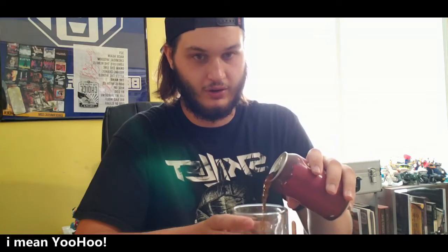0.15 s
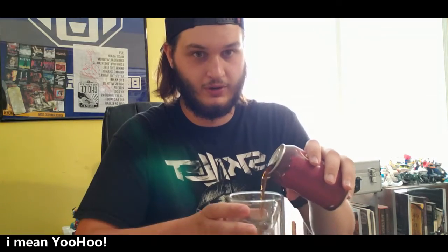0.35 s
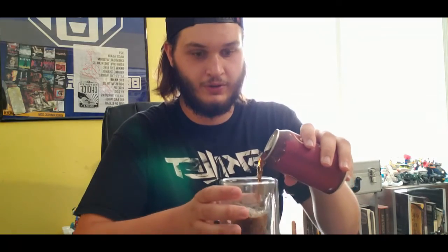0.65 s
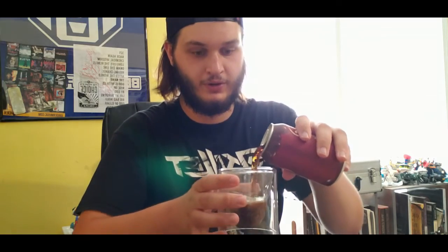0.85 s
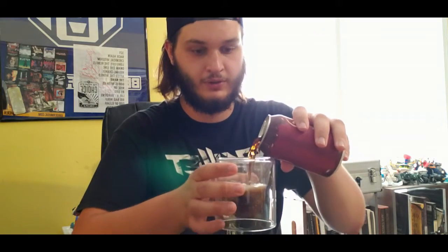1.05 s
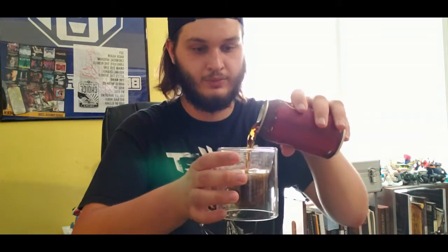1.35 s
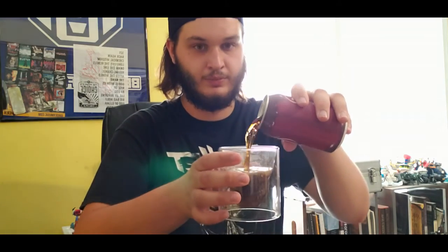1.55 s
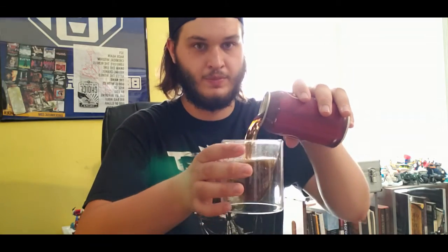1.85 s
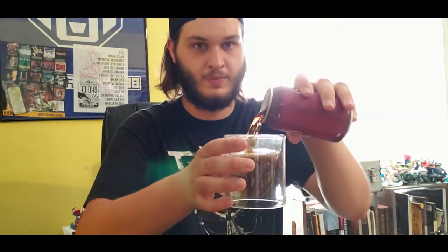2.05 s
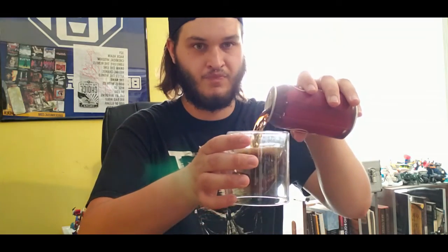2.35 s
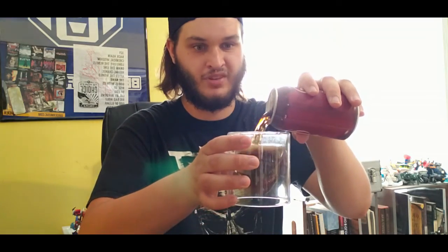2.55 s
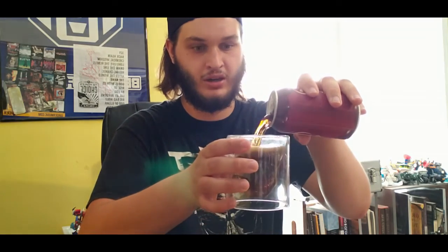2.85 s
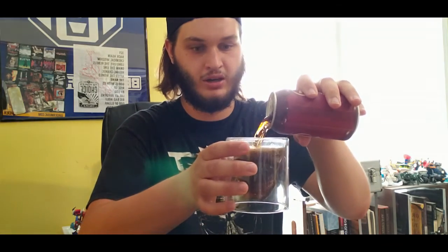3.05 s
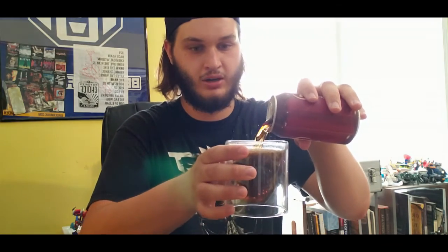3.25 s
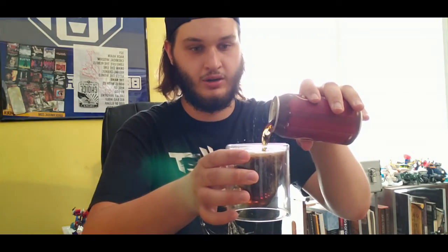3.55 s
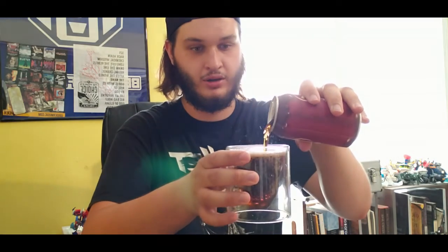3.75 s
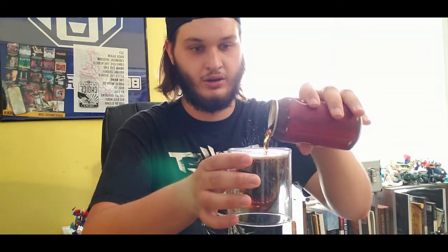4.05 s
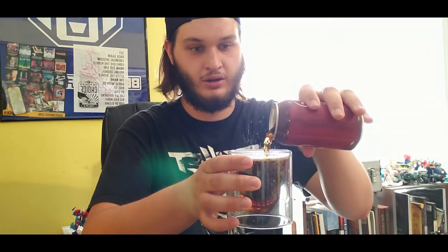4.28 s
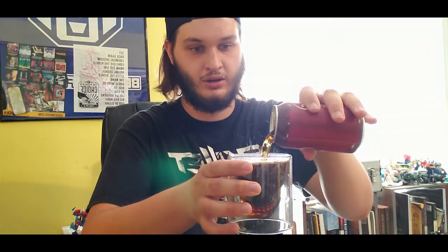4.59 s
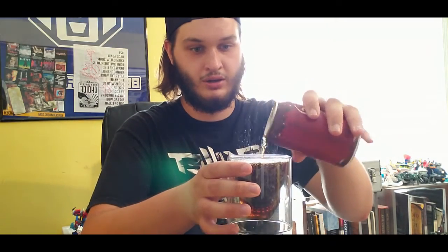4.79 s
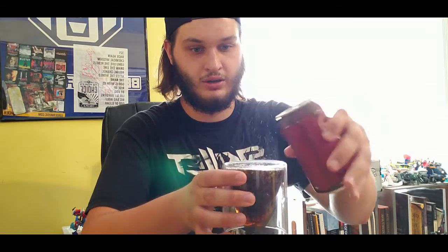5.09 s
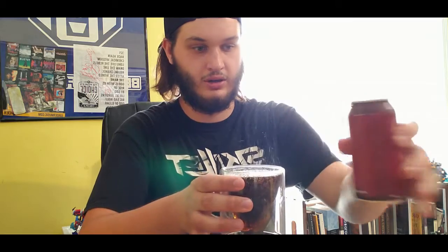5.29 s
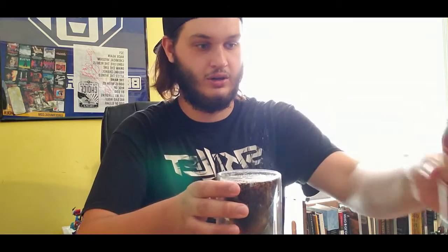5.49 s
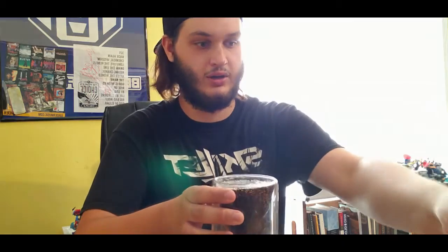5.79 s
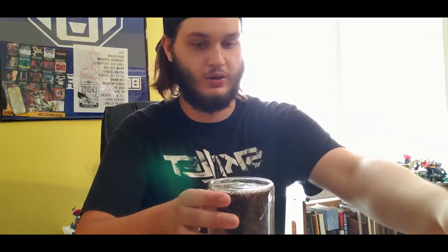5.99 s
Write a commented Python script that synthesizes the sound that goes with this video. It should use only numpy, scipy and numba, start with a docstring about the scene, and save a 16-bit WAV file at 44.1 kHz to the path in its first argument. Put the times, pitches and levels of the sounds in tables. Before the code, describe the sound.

Soda splashes brightly into an empty glass up close, quickly cushions into soft fine fizz, then a can knocks once on a wooden shelf.

```python
"""Soda is poured from a can into a glass close to a pair of microphone ports in a quiet room.
The stream first splashes on the bare bottom: ringing bubbles, noisy spatter and fine spray.
Foam then cushions it, with random clicks as fizz that gets finer in the later part of the pour.
Dull far-off thuds, a fluttering ring and brief low notes come in between, from struck filters and sines.
At the end the can is set down on a wooden shelf and rocks once: soft pulses set shelf and can ringing."""
import sys
import numpy as np
from scipy import signal
from scipy.fft import rfft, irfft, next_fast_len
from scipy.io import wavfile
from numba import njit

SR = 44100
rng = np.random.default_rng(int(sys.argv[2]) if len(sys.argv) > 2 else 0)


def bounce(signal):
    """Save signal as a 16-bit WAV file at the path given by the first command-line argument."""
    frames = np.transpose(np.atleast_2d(signal))
    limited = np.clip(frames, -1, 1)
    pcm = np.round(limited * 32767).astype(np.int16)
    wavfile.write(sys.argv[1], SR, pcm)


N = 270156
TIME = np.arange(N) / SR   # the moment of each sample, in seconds


def amp(db):
    """Decibels to gain."""
    return 10 ** (np.asarray(db) / 20)


def rms_one(x):
    """Scale to unit rms, the usual measure of average strength."""
    return x / np.sqrt(np.mean(x ** 2) + 1e-20)


def filtered(x, order, cut_hz, kind="low"):
    """Smooth filter that keeps the lows, the highs or a band."""
    sos = signal.butter(order, cut_hz, kind, fs=SR, output="sos")
    return signal.sosfilt(sos, x + 1e-18)   # the tiny offset keeps silence from slowing the sums


def in_time(rows):
    """Columns of a curve table, sample by sample."""
    s, *columns = np.transpose(rows)
    return [np.interp(TIME, s, column) for column in columns]


def on_bins(rows, column, size):
    """A table column read at the frequencies of a transform, on a logarithmic pitch scale."""
    hz = np.maximum(np.arange(size // 2 + 1) * SR / size, 1)
    table = np.array(rows)
    return np.interp(np.log(hz), np.log(table[:, 0]), table[:, column])


def coloured(x, rows, column):
    """Minimum-phase filter with the dB response of a table column, so nothing sounds early."""
    size = 8192
    cepstrum = irfft(np.log(amp(on_bins(rows, column, size))))
    # folding the second half onto the first puts the whole response after the start
    cepstrum[1:size // 2] *= 2
    cepstrum[size // 2 + 1:] = 0
    response = irfft(np.exp(rfft(cepstrum)))
    return signal.oaconvolve(x, response)[:N]


def drift(rate):
    """Slow random wandering, spread 1; a higher rate wanders faster."""
    r = np.exp(-80 * np.pi * rate / SR)   # one slow value for every 40 samples
    noise = rng.standard_normal(N // 40 + 2002)
    slow = signal.lfilter([1], [1, -2 * r, r * r], noise)[2000:]
    return np.interp(np.arange(N) / 40, np.arange(len(slow)), rms_one(slow))


def grains(per_s, spread_db):
    """Random clicks of uneven size and sign."""
    sizes = amp(spread_db * np.minimum(rng.exponential(1, N), 5))
    signs = rng.choice([-1, 1], N)
    return sizes * signs * (rng.random(N) < per_s / SR)


def ring(clicks, hz, t60):
    """A unit click sets a sine of height 1 ringing; it falls by 60 dB in t60 seconds."""
    r, w = amp(-60 / (t60 * SR)), 2 * np.pi * hz / SR
    return signal.lfilter([0, np.sin(w)], [1, -2 * r * np.cos(w), r * r], clicks + 1e-18)


@njit
def swept(x, hz, damping, rate):
    """State-variable filter with a moving centre: high-pass and band-pass outputs."""
    high, band, a, b = np.zeros(len(x)), np.zeros(len(x)), 0., 0.
    for i in range(len(x)):
        g = np.tan(np.pi * hz[i] / rate)
        high[i] = (x[i] - (damping + g) * a - b) / (1 + g * (damping + g))
        band[i] = g * high[i] + a
        low = g * band[i] + b
        a, b = 2 * band[i] - a, 2 * low - b
    return high, band


def thinning(count, thin_s):
    """Random times that get rarer, with three chance values each."""
    chance = rng.random((count, 4))
    times = SPRAY_FROM_S - thin_s * np.log(1 - chance[:, 0])
    return np.minimum(times, 5), *chance[:, 1:].T


def patchy(x, depth_db):
    """Each band swells and sinks a little on its own."""
    out, edges = x.copy(), np.geomspace(1500, 15500, 7)
    for low_hz, high_hz in zip(edges, edges[1:]):
        band = filtered(x, 1, [low_hz, high_hz], "band")
        out += (amp(depth_db * drift(21)) - 1) * band
    return out


def room(x, t60, cut_hz):
    """Many mingled echoes make a diffuse dying tail, its own in each channel."""
    t = np.arange(round(t60 * SR)) / SR
    tails = rng.standard_normal((2, len(t))) * amp(-60 * t / t60) * np.minimum(t / 0.008, 1)
    tails = filtered(tails, 1, cut_hz)
    return np.array([signal.oaconvolve(x, tail / np.linalg.norm(tail))[:N] for tail in tails])


# the two ports towards the glass:
# (frequency [Hz], left level [dB], right level [dB], left-right likeness [0 to 1])
PORT_COLOUR = [(477, -1, -7.5, 0.98), (1050, 0, -3.5, .5), (1530, -5, -17.5, 0.098),
               (1840, 0.5, -3.5, 0.13), (2230, -3.5, -16.5, 0.2), (3500, 0, -2.5, 0.45),
               (3870, -1.5, -9, 0.067), (4800, 1, -5, 0.15), (5140, -1, -17, .1), (6890, 5.5, -4, 0.86),
               (7730, 2, -4.5, 0.43), (8770, -4.5, -12.5, .4), (12200, 1.5, -4, 1),
               (15660, 0.5, -3.5, 0.74)]
# narrow lifts at the left port: (frequency [Hz], width [Hz], level against the direct sound [dB])
LEFT_LIFTS = [(1040, 90, -1), (1480, 360, 1), (1750, 107, 5), (2116, 62, 10.5), (4920, 210, -6.5)]


def left_port(x):
    """Narrow resonances join the sound, then the broad colour of the left port shapes it."""
    lifted = x.copy()
    for hz, width_hz, db in LEFT_LIFTS:
        r = np.exp(-np.pi * width_hz / SR)
        b = (1 - r * r) / 2 * np.array([1, 0, -1])
        a = [1, -2 * r * np.cos(2 * np.pi * hz / SR), r * r]
        lifted += amp(db) * signal.lfilter(b, a, x)
    return coloured(lifted, PORT_COLOUR, 1)


def ports(shared, apart):
    """Both ports hear the shared sound; the right one partly hears an unrelated part instead."""
    size = 2 * next_fast_len(N // 2)
    alike = np.clip(on_bins(PORT_COLOUR, 3, size), 0, 1)
    mixed = alike * rfft(shared, size) + np.sqrt(1 - alike ** 2) * rfft(apart, size)
    right = irfft(mixed)[:N]
    return np.array([left_port(shared), coloured(right, PORT_COLOUR, 2)])


# colour of the quiet room: (frequency [Hz], relative level [dB])
ROOM_COLOUR = [(12, -11), (20, -35), (54, -1), (149, -10.5), (191, -18.5), (344, -17), (590, -17),
               (757, -20), (1010, -23), (1390, -23), (4400, -16.5), (5720, -79), (9680, -120)]
ROOM_DB = -66   # mean of the two channels; the left is a little louder


def room_tone():
    """Low steady rumble and faint hiss from shaped noise, more alike in the bass."""
    common, left, right = rng.standard_normal((3, N))
    common = 1.41 * filtered(common, 1, 500)
    both = np.array([coloured(common + own, ROOM_COLOUR, 1) for own in (left, right)])
    return amp(ROOM_DB) * rms_one(both) * amp([[1], [-1]])


# the foam: (time [s], fizz level [dB], pitch of the largest bursting bubbles [Hz],
#            lift by the air in the glass [dB])
FOAM_CURVE = [(0, -42, 2050, -12), (.3, -46, 2250, 6), (.62, -49, 3360, 10.5), (1, -50, 2720, 10.5),
              (1.5, -49, 1860, 4), (2, -48.5, 1490, -0.5), (2.8, -47.5, 1680, -2.5), (3.6, -46, 1960, 2),
              (4.3, -46.5, 2100, 6.5), (4.8, -45, 2740, 3.5), (5.1, -45, 3220, 1), (5.45, -46.5, 4300, 2),
              (5.75, -48, 5700, -22), (6.13, -50.5, 6100, -13)]
STRAGGLER_DB = -14   # larger bubbles, with a softer cut below that pitch
AIR_HZ, AIR_SAG_HZ, AIR_SAG_S = 2816, 900, 1.2   # the air's note sinks to AIR_HZ from 900 Hz above
AIR_DAMPING = .13   # small damping makes a narrow resonance
# a high ring grows once the foam reaches the brim, and climbs to its pitch
BRIM_HZ, BRIM_CLIMB_HZ, BRIM_DB, BRIM_FROM_S, BRIM_RISE_S = 7500, 800, -0.5, 4.67, 0.88


def fizz():
    """Thousands of bubbles burst each second; as the foam settles only the small, high ones are left."""
    fizz_db, edge_hz, air_db = in_time(FOAM_CURVE)
    level = amp(fizz_db + 0.52 * drift(15))
    parts = []
    for _ in range(2):
        small = rms_one(grains(14000, spread_db=2.5))
        large = rms_one(grains(4300, spread_db=3.0))
        for damping in (1.6, 1.2, .8):   # three high-pass stages make a steep edge
            small = swept(small, edge_hz, damping, SR)[0]
        stragglers = amp(STRAGGLER_DB) * swept(large, edge_hz, 2.9, SR)[0]
        parts.append(level * (small + stragglers))
    heard = ports(*parts)
    air_hz = AIR_HZ + AIR_SAG_HZ * np.exp(-TIME / AIR_SAG_S)
    brim = np.clip((TIME - BRIM_FROM_S) / BRIM_RISE_S, 0, 1)
    brim_hz = BRIM_HZ - BRIM_CLIMB_HZ * (1 - brim)
    # the mouth of the glass faces the left port
    for hz, gain in ((air_hz, amp(air_db)), (brim_hz, amp(BRIM_DB) * brim)):
        heard[0] += gain * AIR_DAMPING * swept(heard[0], hz, AIR_DAMPING, SR)[1]
    return patchy(heard, depth_db=.9)


# bubbles dragged under by the stream: (time [s], level [dB])
STREAM_CURVE = [(0.0, -52), (0.2, -59), (0.56, -51), (0.92, -59.5), (2.24, -64), (3.65, -64.5), (3.87, -70),
                (4.6, -85)]


def gurgle():
    """Bubbles dragged under by the stream ring about ten cycles."""
    clicks = grains(1500 * amp(1.0 * drift(15)), spread_db=4.5)
    pitches = np.geomspace(960, 1550, 12)
    dealt = rng.integers(0, 12, N)   # each click is dealt to one pitch
    notes = sum(ring(clicks * (dealt == k), hz, 10.0 / hz) for k, hz in enumerate(pitches))
    return amp(in_time(STREAM_CURVE)[0]) * rms_one(notes)


# the loud spatters of flung drops: (time [s], peak level [dB], centre pitch [Hz])
LOUD_SPATTERS = [(0.0124, -27, 6480), (0.0197, -26, 6240), (0.031, -12.5, 7700), (0.0394, -22, 8100),
                 (0.0817, -34, 5900), (0.0879, -13, 8900), (0.0944, -20, 3870), (0.114, -18, 3900),
                 (0.121, -22, 3650), (0.1294, -23.5, 3900), (0.1516, -23.5, 7300), (0.2117, -23, 3670),
                 (0.2448, -22, 2850), (0.2588, -19.5, 4760), (0.2853, -18, 3770), (0.292, -25, 4000),
                 (0.417, -25, 7500), (0.449, -28, 7700), (0.5003, -17.5, 4800), (0.5096, -22, 7600),
                 (0.5447, -20.5, 7900), (0.6789, -25.5, 7800), (1.3798, -37.5, 3440), (2.5454, -29.5, 7800)]
# lesser drops at random: loudest level and its fading, thinning, and pitch before chance is added
DROP_DB, DROP_LOSS_DB_PER_S, DROP_THIN_S, DROP_HZ = -25.5, 17, .2, 3630


def spatter():
    """Each spatter is a burst of crackle with a ring at its own pitch."""
    out, t = np.zeros(N), np.arange(1500) / SR
    s, a, b, c = thinning(count=26, thin_s=DROP_THIN_S)
    drop_db = DROP_DB - DROP_LOSS_DB_PER_S * s - 11.0 * a
    octave = np.where(c < .5, 1, 2)   # about half of them ring an octave higher
    drop_hz = DROP_HZ * (0.845 + 0.3 * b) * octave
    drops = [*LOUD_SPATTERS, *zip(s, drop_db, drop_hz)]
    for (s, db, hz), n in zip(drops, rng.standard_normal((len(drops), 1500))):
        crackle = n * np.abs(n) * amp(-60 * t / 0.023)
        burst = np.diff(crackle, prepend=0) + amp(-7.5) * ring(crackle, hz, 20.0 / hz)
        i = round(s * SR)
        out[i:i + 1500] += amp(db) * burst / np.abs(burst).max()
    return out


SPRAY_DB, SPRAY_FROM_S, SPRAY_LOSS_DB_PER_S = -43, 0.013, 55   # level at the start, start, fading


def spray():
    """Dense bright crackle of fine droplets off the bare bottom, dying as the pool deepens."""
    t = TIME - SPRAY_FROM_S
    crackle = grains(2500 * amp(4.2 * drift(28)), spread_db=2.5)
    crackle = filtered(crackle, 2, [2200, 9000], "band")
    return amp(SPRAY_DB - SPRAY_LOSS_DB_PER_S * t) * (t > 0) * rms_one(crackle)


# the loud splashes: (time [s], level [dB], bubble pitch [Hz], cavity level against the bubble [dB])
LOUD_SPLASHES = [(0.016, -31, 1080, -13), (0.042, -21.5, 1130, -7.5), (0.06, -18, 1480, -4.5),
                 (0.094, -25, 1230, -14), (0.121, -15.5, 1280, -10), (0.155, -9.5, 1225, -34),
                 (0.17, -20, 1130, -8.5), (0.189, -19, 1320, -9), (0.218, -11, 1180, -11.5),
                 (0.248, -22, 1180, -5.5), (0.259, -20, 1210, -15), (0.285, -24, 1110, -23),
                 (0.298, -20, 1140, -23), (0.317, -22.5, 1180, -17.5), (0.326, -25.5, 1230, -15),
                 (0.394, -17.5, 1210, -7.5), (0.417, -20.5, 1020, -16), (0.45, -19.5, 1240, -20),
                 (0.468, -20, 1350, -14), (0.488, -21, 875, -18), (0.506, -27, 1280, -7),
                 (0.543, -24.5, 940, -12), (0.566, -35, 1040, -1), (0.58, -24, 1190, -4),
                 (0.607, -22.5, 1180, -3.5), (0.679, -26.5, 1170, -7), (0.704, -32.5, 1170, -7.5),
                 (0.772, -31.5, 1150, -12), (0.811, -31, 1230, -20), (0.851, -34, 1030, -21),
                 (0.894, -27.5, 1250, -15), (1.124, -36.5, 1270, -17), (1.139, -35, 1050, -23),
                 (1.381, -36.5, 1040, -30)]
# lesser splashes at random: loudest level and its fading, thinning, and pitch before chance is added
SMALL_DB, SMALL_LOSS_DB_PER_S, SMALL_THIN_S, SMALL_HZ = -31, 8, 0.75, 1150
# the cavity note's starting pitch is lower for later splashes, as the pool deepens
CAVITY_HZ, CAVITY_SAG_HZ_PER_S, CAVITY_SAG_UNTIL_S = 433, 1550, 0.2365
UPPER_HZ, UPPER_FROM_S, UPPER_RISE_S = 750, 0.49, 0.091   # then a higher note joins it
TICK_DB = -10.5   # tick that opens each splash, against the bubble


def splashes():
    """Each splash: a short bubble rising in pitch and a lower cavity note, opened by a tick."""
    out, t = np.zeros(N), np.arange(2000) / SR
    s, a, b, c = thinning(count=12, thin_s=SMALL_THIN_S)
    small_db = SMALL_DB - SMALL_LOSS_DB_PER_S * s - 2.7 * a
    small_hz = SMALL_HZ * (1.11 + 0.51 * b)
    rows = [*LOUD_SPLASHES, *zip(s, small_db, small_hz, -8.0 - 14 * c)]
    ticks = np.diff(rng.standard_normal((len(rows), 61))) * amp(-60 * t[:60] / 0.002)
    rise = t + 2.0 * t ** 2   # time that speeds up lifts the pitch
    for (s, db, hz, low_db), tick in zip(rows, ticks):
        upper = np.clip((s - UPPER_FROM_S) / UPPER_RISE_S, 0, 1)
        low_hz = CAVITY_HZ + CAVITY_SAG_HZ_PER_S * max(CAVITY_SAG_UNTIL_S - s, 0)
        bubble = np.sin(2 * np.pi * hz * rise) * amp(-60 * t / 0.015)
        low_note = (1 - 0.31 * upper) * np.sin(2 * np.pi * low_hz * rise)
        note = low_note + upper * np.sin(2 * np.pi * UPPER_HZ * rise)
        cavity = amp(low_db) * note * amp(-60 * t / 0.037) * np.minimum(t / 0.0035, 1)
        i = round(s * SR)
        out[i:i + 2000] += amp(db) * np.minimum(t / 0.00086, 1) * (bubble + cavity)
        out[i:i + 60] += amp(db + TICK_DB) * tick
    return filtered(out, 4, 370, "high")


FLUTTER_HZ, FLUTTER_T60_S, FLUTTER_DB = 2150, 0.034, -69   # pitch, decay, full level
FLUTTER_S = (1.2, 2.2, 4.6, 5.0)   # start, full, fade, end


def flutter():
    """Uneven pops keep one narrow resonance ringing while the stream falls through foam."""
    level = np.interp(TIME, FLUTTER_S, (0, 1, 1, 0))
    pops = grains(300, spread_db=5.0)
    return amp(FLUTTER_DB) * level * rms_one(ring(pops, FLUTTER_HZ, FLUTTER_T60_S))


# thuds from far off: (time [s], strength of the blow [dB])
FAR_THUDS = [(1.262, -17.5), (1.489, -17), (2.48, -29.5), (3.474, -15.5), (3.738, -20.5), (4.867, -33)]
REBOUND_S, REBOUND_DB = 0.025, -10   # each thud is doubled by a weaker one


def thuds():
    """Dull blows, a boom and a woody knock, heard directly and through tails of room sound."""
    clicks = np.zeros(N)
    for s, db in FAR_THUDS:
        clicks[round(s * SR)] = amp(db)
    clicks = clicks + amp(REBOUND_DB) * np.roll(clicks, round(REBOUND_S * SR))
    knock = filtered(clicks, 2, [450, 1300], "band")
    boom = filtered(clicks, 2, [100, 330], "band")
    dull = knock + amp(-3) * boom
    return room(dull, 0.11, 620) + 0.32 * room(dull, 0.044, 1800)[0] + 0.55 * dull


# short soft low rings: (time [s], pitch [Hz], level [dB], time to fall to half height [s])
LOW_RINGS = [(1.885, 364, -70, 0.033), (2.498, 426, -59.5, 0.018), (2.711, 426, -60.5, 0.012),
             (4.739, 380, -71, 0.044), (4.844, 455, -59.5, 0.03), (5.304, 485, -57.5, 0.042)]


def rings():
    """Brief steady sine notes that start fast and fade."""
    out, t = np.zeros(N), np.arange(6000) / SR
    for s, hz, db, length in LOW_RINGS:
        i = round(s * SR)
        shape = np.minimum(t / 0.0014, 1) / (1 + (t / length) ** 4)
        out[i:i + 6000] += amp(db) * np.sin(2 * np.pi * hz * t) * shape
    return out


# can on shelf: (time [s], strength [dB], contact cut-off [Hz])
CAN_KNOCKS = [(5.9226, -10, 2860), (6.053, -26, 372), (6.07, -37.5, 605)]
# notes of the wooden shelf: (pitch [Hz], relative level [dB], time to fall by 60 dB [s])
SHELF_NOTES = [(132.3, -11, 0.29), (167, -14, 0.63), (189.3, 8.5, 0.16), (238, -5, 0.085), (329, 0, 0.13),
               (374, -25, 0.03), (464, -9, 0.14), (515, -2.5, 0.13), (674, -4, 0.061), (756, -2.5, 0.082),
               (846, -1.5, 0.055), (960, -30, .12)]
# notes of the can: (pitch [Hz], relative level [dB], time to fall by 60 dB [s])
CAN_NOTES = [(1364, 6.5, 0.033), (2500, 0, 0.036), (3040, -2, 0.096), (3900, 3, 0.033), (5240, 16.5, 0.011)]


def knocks():
    """A contact pulse, softer for the rock back, strikes shelf and can; the room answers."""
    push = np.zeros(N)
    for s, db, hz in CAN_KNOCKS:
        click = np.zeros(N)
        click[round(s * SR)] = -amp(db)
        push += filtered(click, 2, hz)
    shelf = sum(amp(db) * ring(push, hz, t60) for hz, db, t60 in SHELF_NOTES)
    shelf = filtered(shelf, 2, [300, 650], "band") + 0.29 * shelf   # it takes a cycle to get going
    shelf = filtered(shelf, 2, 120, "high")   # a small board radiates little bass
    can = amp(-22.0) * sum(amp(db) * ring(push, hz, t60) for hz, db, t60 in CAN_NOTES)
    thump = filtered(push, 2, [130, 750], "band")
    clack = filtered(push, 2, 1000, "high")
    # the shelf is nearer the left port: louder there, and later at the right
    body = (shelf + amp(24.0) * room(thump, 0.15, 380)[0]) * amp([[1], [-1]])
    body[1] = np.roll(body[1], round(0.00028 * SR))
    boom = amp(2.5) * room(thump, 0.42, 740)
    bright = (can + amp(11) * room(clack, 0.14, 8700)) * amp([[4], [-5]])
    return body + boom + bright


PORT_LAG_S = 0.000303   # the right port is further away from the pour


def scene():
    """Everything that reaches the two ports."""
    pour = splashes() + spatter() + gurgle() + spray() + flutter()
    wet = amp(-10) * room(pour, .07, 7300)
    late = np.interp(np.arange(N) - PORT_LAG_S * SR, np.arange(N), pour)
    heard = np.array([left_port(pour + wet[0]), coloured(late + wet[1], PORT_COLOUR, 2)])
    return heard + fizz() + thuds() + rings() + knocks() + room_tone()


CUTOFF_HZ = 15800


def record(dry):
    """The top is cut steeply."""
    return signal.sosfilt(signal.ellip(12, .5, 75, CUTOFF_HZ, fs=SR, output="sos"), dry)


dry = scene()
out = record(dry)
bounce(out)
```